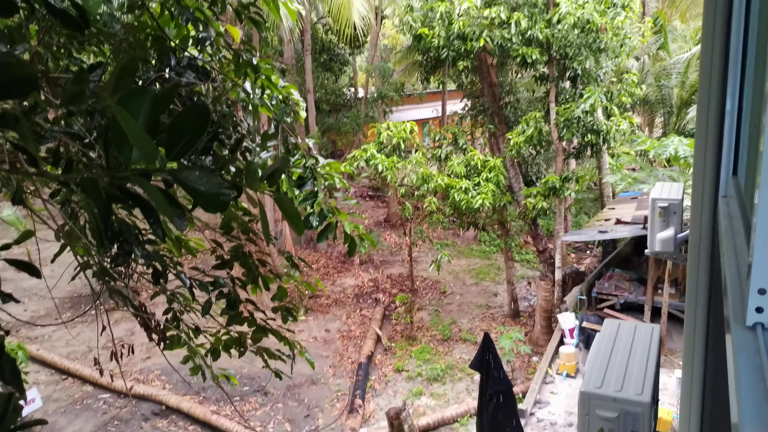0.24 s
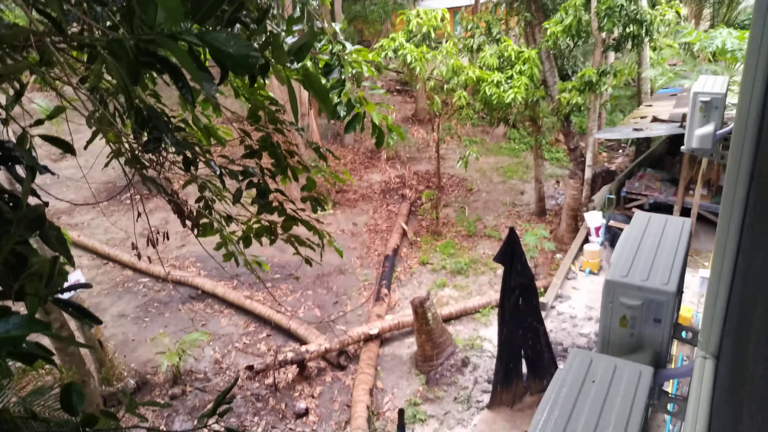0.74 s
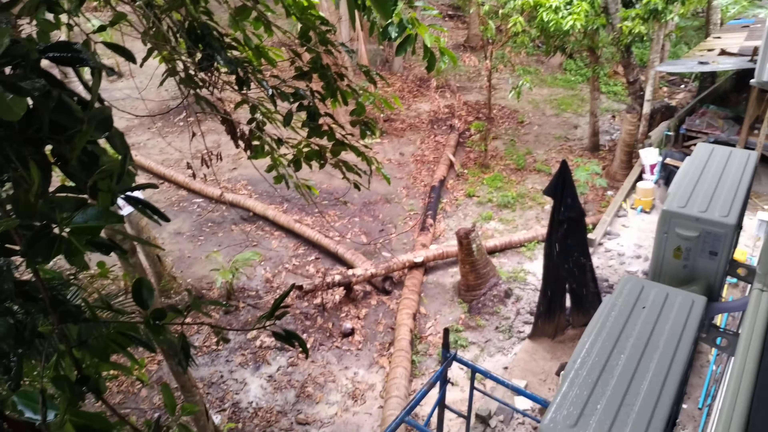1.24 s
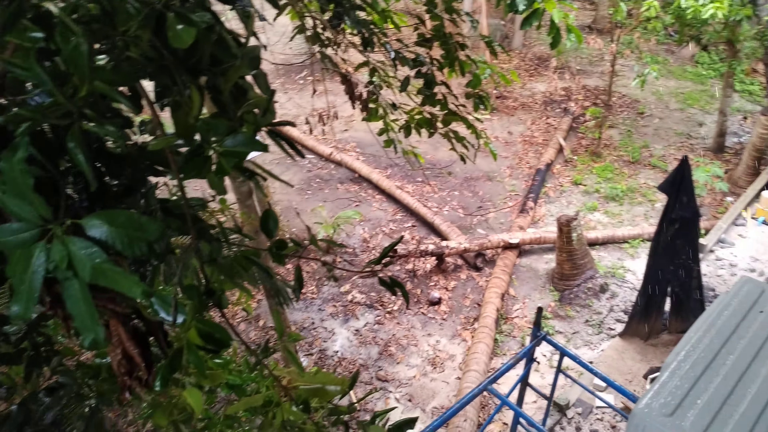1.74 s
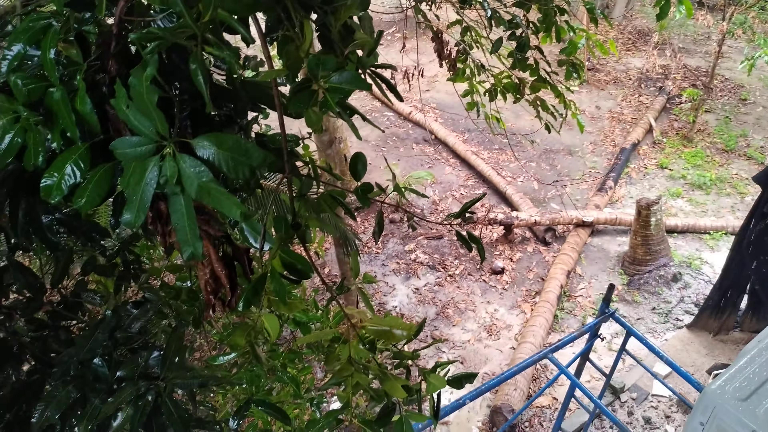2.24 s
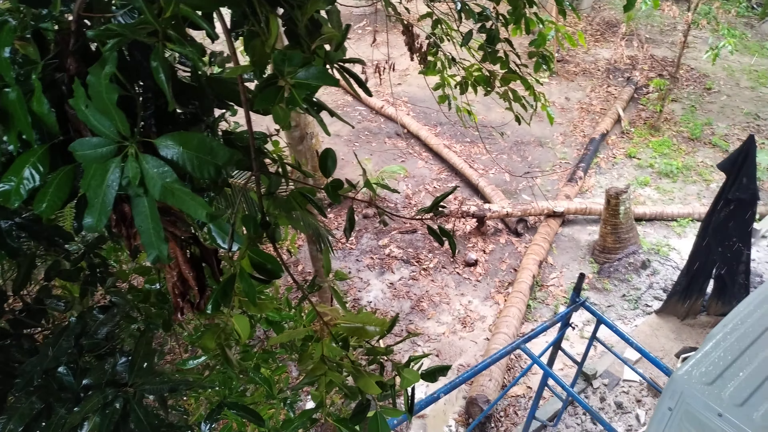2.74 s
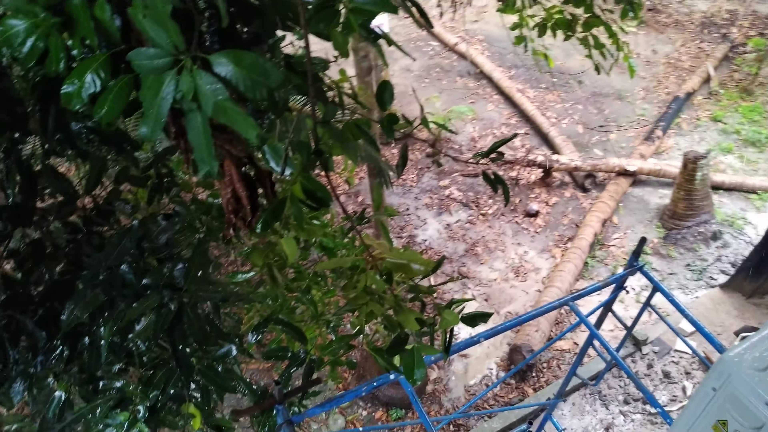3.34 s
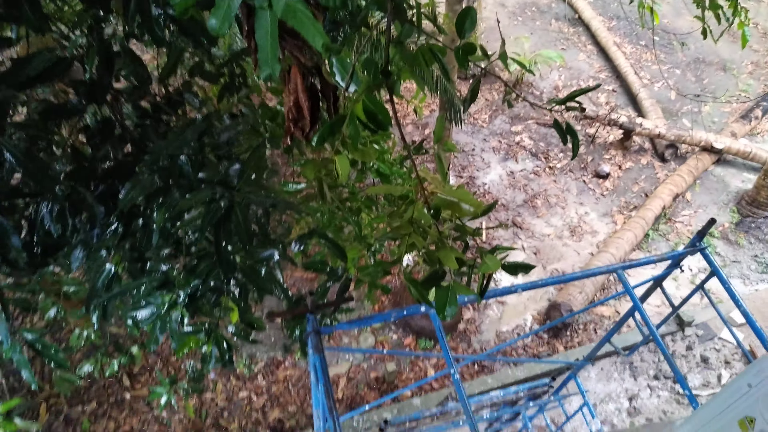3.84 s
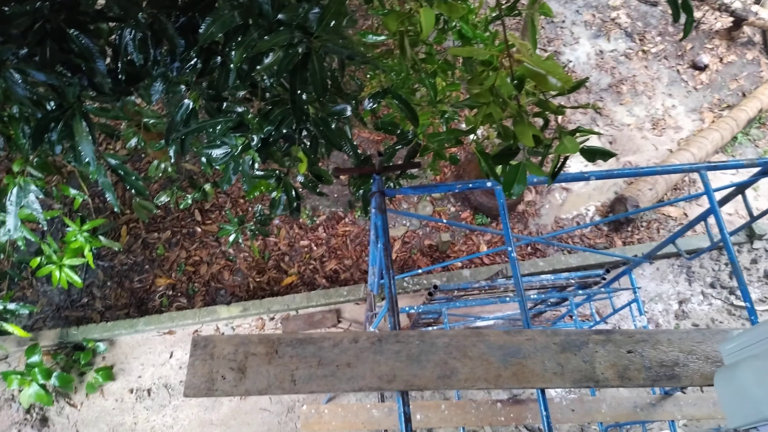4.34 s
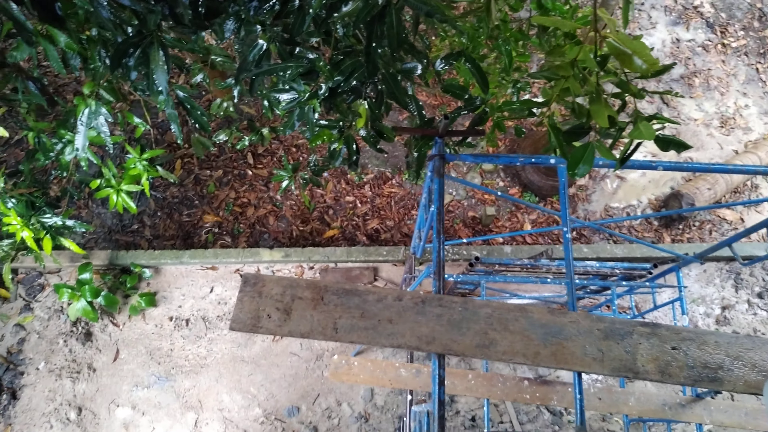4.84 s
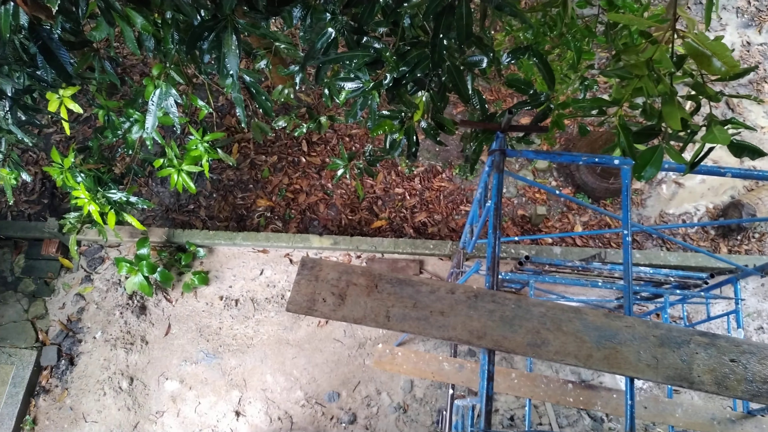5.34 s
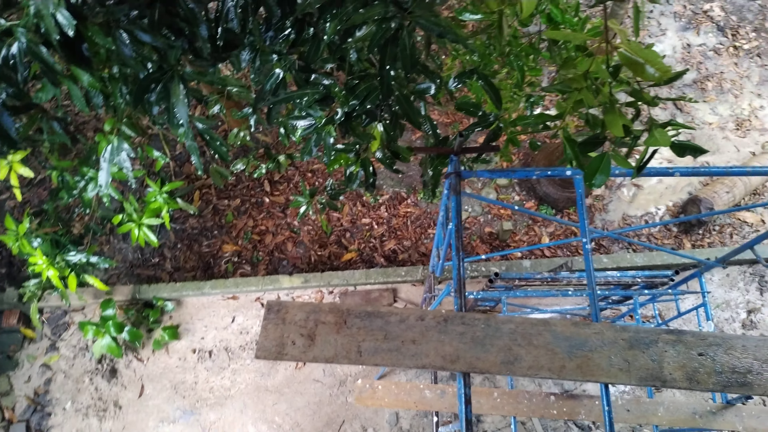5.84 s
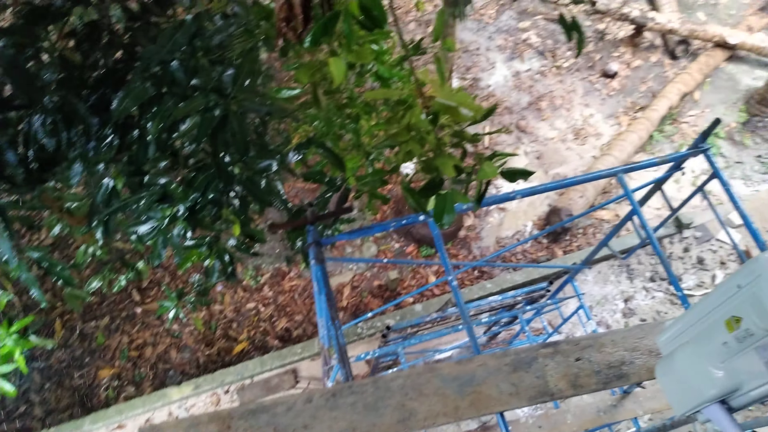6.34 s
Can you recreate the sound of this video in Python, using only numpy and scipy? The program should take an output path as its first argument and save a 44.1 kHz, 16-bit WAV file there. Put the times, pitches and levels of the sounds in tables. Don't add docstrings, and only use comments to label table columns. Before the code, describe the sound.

Steady downpour heard from a window: bright hiss, spattering eaves water, sharp ticks and small leaf knocks, plus brief finger thumps midway.

```python
import sys
import numpy as np
from scipy import signal
from scipy.fft import rfft, irfft
from scipy.io import wavfile
from scipy.ndimage import uniform_filter1d

SR = 44100
rng = np.random.default_rng(int(sys.argv[2]) if len(sys.argv) > 2 else 0)


def int16_out(signal):
    q = np.round(np.clip(np.atleast_2d(signal).T, -1, 1) * 32767)
    wavfile.write(sys.argv[1], SR, q.astype(np.int16))


def field_ratio(decibels):
    return 10 ** (np.asarray(decibels, dtype=float) / 20)


N = 290619

# [t/s, firing rate/Hz, loudest region f/Hz, level/dB]
ENGINE = [(0, 20.6, 103, -62), (1.1, 20.4, 100, -75), (1.7, 20.7, 138, -65.5), (2.5, 22.6, 132, -60.5),
          (3.6, 22.3, 128, -64), (4.05, 22.3, 114, -58.5), (4.4, 22.34, 110, -57.5), (4.52, 24.4, 138, -54),
          (5.15, 24.4, 144, -58.5), (5.5, 24.4, 111, -56.5), (6.0, 24.5, 121, -58), (6.2, 25, 155, -60),
          (6.59, 25, 150, -69)]
# [t/s, level/dB]
BREEZE = [(0, -52.5), (1.2, -54.5), (1.9, -57), (2.6, -55.5), (3.3, -51), (4.9, -54.5), (5.15, -60),
          (5.8, -52), (6.59, -59)]
# [t/s, peak level/dB, left minus right/dB, fall time/s]
GUSTS = [(.09, -54, 0, .3), (.64, -41, -5, 0.078), (.91, -61, -14, .1), (1.19, -52.5, 2, 0.44),
         (2.02, -57, 5, 0.13), (2.67, -51, 5, .15), (2.89, -46, 7, 0.077), (3.49, -47, -3, 0.1),
         (5.31, -45.5, 11, 0.13), (5.42, -43, 18.5, 0.12), (5.53, -40, -14, 0.066), (5.61, -45, 10, 0.036),
         (6.13, -53, 9, 0.12), (6.33, -49, 5, 0.069), (6.51, -46, 3, .07)]
# [t/s, pressure, length/ms, scrape level/dB]
BUMPS = [
    (3.438, -0.12, 0.59, -41),
    (3.44, 0.071, 2.9, -32),
    (3.445, -0.0019, .35, -38),
    (3.482, -0.079, 0.73, -48),
    (3.7948, 0.47, 3.7, -35),
    (3.8039, -0.42, 1.6, -26),
    (3.8067, -0.5, 0.62, -34),
    (3.813, -0.13, 6.6, -50),
    (3.84, 0.025, 42, -64),
    (3.9983, 0.05, 0.22, -20),
]
# [f/Hz, level/dB]
WASH = [(60, -5), (500, 1.5), (2000, -2.5), (5000, -4.5), (10000, -4), (15000, -2.5)]
# [t/s, peak level/dB, f/Hz, left
# minus right/dB, ring time/ms]
KNOCKS = [(0.149, -39, 2170, -7, 2.4), (0.253, -21, 3200, -7.5, 6.9), (0.554, -33, 288, -4, 6.1),
          (1.023, -28.5, 3260, -12, 3.9), (1.22, -27, 4060, 0.0, 3.2), (1.528, -36, 2400, -0.5, 3),
          (2.104, -30, 3660, 0.5, 2.7), (2.16, -34, 2080, 5, 3.7), (2.292, -24.5, 3320, -7, 6.4),
          (3.0286, -16.5, 790, 3, 2.16), (3.635, -31, 2400, -2.0, 2.3), (3.946, -23, 3930, 2, 2.7),
          (3.954, -17.5, 4960, -9, 2.5), (4.139, -33, 2130, -2, 3), (4.306, -20, 3900, -2, 2.6),
          (2.125, -33, 438, -3, 8.3), (2.293, -33, 340, -4, 5.8), (1.545, -33, 300, 0, 6.6),
          (4.742, -25, 4010, -8, 4.3), (5.827, -32, 2130, -1.0, 3), (5.939, -26.5, 2840, -6, 7.5),
          (6.032, -30.5, 1960, 3, 3.5), (6.158, -24.5, 5040, -10, 3.3), (6.362, -24, 4620, 2, 3.6),
          (3.0285, -24.5, 1500, 12, 1.9), (3.0286, -18, 5700, 6, 2.1), (3.3, -28, 3500, 3, 1.3),
        (4.4, -39, 380, -3, 4), (4.5, -28, 2600, 2, 4.4), (3.443, -27, 1050, -15, 3),
        (3.47, -40, 300, -12, 8), (3.9, -42, 350, -16, 6), (4.4, -27.5, 1300, -8, 1.2),
        (3.998, -30, 286, -9, 4), (3.84, -37, 980, -19, 3.3), (3.773, -34, 190, -22, 8),
        (3.79, -28, 650, -25, 6.9)]
# [t/s, click level/dB, left minus right/dB, burst level/dB]
TICKS = [(0.041, -28, -6, -26), (0.253, -16, 8, -11.5), (2.1042, -17, 6, -15), (2.305, -12, 1, -19),
         (2.4072, -14.5, 8, -17), (2.435, -26, 4, -18), (3.0299, -11.5, 5, -10), (3.03, -12, 8, -24),
         (3.378, -24, 11, -22), (3.7245, -18, 11, -18), (3.735, -18, 3, -19), (3.9982, -13, -18, -28),
         (4.406, -15, 2, -10.5), (4.4619, -12.5, -4, -16), (5.0437, -26, 4, -17), (5.1605, -10, -1, -16),
         (5.429, -18, 15, -15), (5.543, -22, 0, -12), (5.646, -14, 11, -28), (6.0905, -14, 6, -8),
         (6.145, -11, 2, -10.5), (6.369, -24, -1, -20), (6.3916, -11, 4, -10), (6.402, -14, 2, -28)]
# [t/s, click level/dB, left minus right/dB]
CRACKLES = [(.399, -22, 3), (.5114, -23, .5), (1.025, -19, 5), (1.1467, -23, 4), (1.2789, -26, 4),
            (1.702, -26, 5), (2.2337, -20, 4), (2.2422, -10, 5), (2.4174, -23, 4), (3.0384, -20, 3.5),
            (3.3607, -25, 5), (3.7992, -14, -2.5), (4.305, -22, 0), (4.744, -17, -.5), (4.7729, -23, 1),
            (4.8498, -20, 2.5), (4.8747, -24, 3), (6.0032, -25, 5), (6.0664, -19, -1.5), (6.0929, -17, 0),
            (6.0993, -16, -3), (6.1094, -19, 3), (6.138, -15, .5), (6.1484, -18, 4)]
# [t/s, level/dB, left minus right/dB]
SNAPS = [
    (3.0295, -11, 5),
    (3.9983, -15, -16),
    (5.6456, -24, 8),
    (3.7246, -21, 5),
    (6.0908, -18, 4),
    (6.3916, -23, 3),
]
# [t/s, peak level/dB, left minus right/dB]
DROPS = [(0.1458, -20.5, 2.5), (.397, -14.5, 4), (.5043, -16.5, 2), (1.02, -15.5, 12), (1.139, -16, 7),
         (1.314, -16, 5), (1.49, -13, 3), (1.7387, -19.5, 2), (1.8837, -21, 7), (2.0379, -18, 5),
         (2.642, -20.5, 2), (2.861, -20, 6), (2.909, -22, 0), (3.0732, -13, 6), (3.4512, -16.5, 7),
         (3.8268, -11, 3), (3.9488, -16, 4), (3.9722, -14, -1), (4.0724, -19, -4), (4.182, -16.5, -1),
         (4.3233, -17, -1), (4.572, -19, -3), (4.7456, -18.5, -5), (4.869, -16, 5), (5.072, -20, 12),
         (5.243, -20, 9), (5.8342, -17.5, -5), (5.945, -18, -8), (6.0544, -14, -1), (6.289, -19, 0)]
# [t/s, flow level/dB, heaviness of the water/dB]
FLOW = [(0, -47, 18), (.24, -34, 8.5), (.92, -36.5, 7), (1.1, -39, -10), (1.3, -32, -22), (1.62, -43.5, 17),
        (2.09, -36.5, 10), (2.45, -33.5, 6), (2.6, -40.5, 6), (2.97, -36, 8.5), (3.65, -35.5, 5.5),
        (3.9, -31, -8), (4.3, -34, -13), (4.8, -31, 3.5), (5.3, -34.5, -32), (5.7, -34.5, 3),
        (6.1, -31, 1.5), (6.59, -37.5, -11)]
# [t/s, peak level/dB, left minus right/dB, fall time/s]
SPLASHES = [(.26, -37, -4, .1), (1.03, -36, 4, 0.013), (1.34, -34.5, 10, 0.064), (1.52, -33, 6, 0.067),
            (2.11, -34.5, 6, 0.16), (2.246, -30, 1.5, 0.036), (2.307, -25.5, 3, 0.03),
            (2.48, -29.5, 2, 0.049), (2.66, -39, 11, 0.24), (3.03, -29.5, 1, 0.18), (3.28, -34.5, 9, 0.043),
            (3.38, -32.5, 2, 0.31), (3.727, -29, 1, 0.095), (3.8, -29.5, -6, .1), (3.89, -35, 9, .07),
            (4.04, -30.5, -4, 0.15), (4.26, -29.5, 1, 0.072), (4.33, -32, -2, 0.057), (4.41, -45, 2, .3),
            (4.75, -37, 0, .1), (4.86, -28.5, 4.5, 0.17), (5.16, -45, -1, 0.069), (5.25, -31, -0.5, 0.46),
            (5.43, -28.5, 0, 0.11), (5.54, -33.5, 6, 0.074), (5.63, -43, 4, 0.05), (5.96, -37, -4, 0.045),
            (6.15, -28.5, 0, 0.077), (6.35, -30, -4, .1), (6.44, -31.5, 0, 0.19)]
# [f/Hz, level/dB]
SPRAY = [(200, -49), (1000, -18.5), (2500, -7), (5000, -8.5), (10000, -1.5), (15000, -2)]
# [f/Hz, level/dB]
LEFT_EAR = [(60, -1.5), (200, -2.5), (600, -3.5), (1200, 0), (2050, 5), (3000, -0.5), (4100, -5), (5500, 1),
            (7500, -2), (12000, -3.5), (14500, -5)]
RIGHT_EAR = [(60, 0.5), (200, -1.5), (600, -3.5), (1200, -1), (2050, 2), (3100, 0), (4300, 0.5),
             (5500, -1.5), (7000, -1.5), (11000, -7.5), (14500, -13)]
# [f/Hz, width/Hz, lift/dB]
PORTS = [
    (10070, 737, 17.5),
    (8536, 800, 15.5),
]

TAIL = 6000


def colour(x, points):
    hz, db = np.transpose(points)
    f = np.maximum(np.arange(1025) * SR / 2048, 1)
    log_gain = np.interp(np.log(f), np.log(hz), db) * np.log(10) / 20
    cepstrum = irfft(log_gain)
    cepstrum[1:1024] *= 2
    cepstrum[1025:] = 0
    response = irfft(np.exp(rfft(cepstrum)))
    response = response.reshape((1,) * (x.ndim - 1) + (-1,))
    return signal.fftconvolve(x, response, axes=-1)[..., :N]


def ring(x, hz, width):
    return signal.lfilter(*signal.iirpeak(hz, hz / width, fs=SR), x)


def unit(x):
    return x / np.sqrt(np.mean(x ** 2))


def walk(rate):
    hold = int(SR / rate)
    held = rng.standard_normal(400)[np.arange(N) // hold]
    return 1.42 * uniform_filter1d(uniform_filter1d(held, hold), hold)


def curves(table):
    s, *columns = np.transpose(table)
    return [np.interp(np.arange(N) / SR, s, column) for column in columns]


def sides(pan_db):
    return field_ratio(np.array([[pan_db], [-pan_db]]) / 2)


def add_at(out, s, sound):
    start = int(s * SR)
    out[:, start:start + sound.shape[1]] += sound


def swells(table, rise):
    t = np.arange(0, N, 32) / SR
    power = 0
    for s, db, pan_db, fall_s in table:
        fade = np.maximum((t - s) / fall_s, (s - t) / (rise * fall_s))
        power = power + sides(pan_db) ** 2 * field_ratio(2 * db - 20 * fade)
    return np.repeat(power, 32, axis=1)[:, :N]


def crackling(size):
    return signal.lfilter([1], [1, -.93], size)


def patter(rate, spread_db, shared):
    hit = rng.random(N) < rate / SR
    size = hit * field_ratio(spread_db * np.minimum(rng.exponential(size=N), 5))
    noise = rng.standard_normal((3, N))
    return unit(crackling(size) * (shared * noise[0] + noise[1:]))


def engine():
    rate_hz, loud_hz, level_db = curves(ENGINE)
    turn = 2 * np.pi * np.cumsum(rate_hz) / SR
    out = 0
    for k in range(3, 10):
        loss_db = np.minimum(0.42 * abs(k * rate_hz - loud_hz), 14)
        gain = field_ratio(level_db - 1.5 - loss_db + 2.0 * walk(2.95))
        out = out + gain * np.sin(k * turn + 6 * rng.random())
    return out


def wind():
    strength = np.sqrt(field_ratio(2 * curves(BREEZE)[0]) + swells(GUSTS, rise=0.77))
    band = signal.butter(2, [14, 52], "band", fs=SR, output="sos")
    rumble = unit(signal.sosfilt(band, rng.standard_normal((2, N))))
    flutter_db = 0.5 + 0.37 * np.array([walk(22), walk(22.18)])
    return field_ratio(flutter_db) * strength * rumble


def finger():
    t, out = np.arange(N) / SR, 0
    scrape = unit(ring(ring(rng.standard_normal(N), 600, 1300), 600, 1300))
    for s, pressure, ms, scrape_db in BUMPS:
        hump = np.exp(-.5 * ((t - s) * 1000 / ms) ** 2)
        out = out + hump * (pressure + field_ratio(scrape_db) * scrape)
    return np.array([field_ratio(-46) * out, out])


def wash():
    alike_hz, lag_ms = 860, 0.22
    common, own = rng.standard_normal(N), rng.standard_normal((2, N))
    low = signal.butter(1, alike_hz, fs=SR)
    common = signal.lfilter(*low, common)
    late = np.interp(np.arange(N) - lag_ms * SR / 1000, np.arange(N), common)
    own_treble = own - 1.05 * signal.lfilter(*low, own)
    hiss = colour(np.array([late, common]) + own_treble, WASH)
    patches = 0
    for hz in (350, 700, 1400, 2800, 5600, 11200):
        flicker = 0.15 * (walk(4.98) + walk(17))
        patches = patches + flicker * ring(hiss, hz, 0.35 * hz)
    return field_ratio(-36) * (hiss + patches)


def knocks():
    blow, width_share = 10.7, 0.29
    out, ms = np.zeros((2, N + TAIL)), np.arange(TAIL) / SR * 1000
    for s, peak_db, hz, pan_db, ring_ms in KNOCKS:
        noise = rng.standard_normal((3, TAIL))
        push = blow * (ms == 0) + noise[0] + 2.5 * noise[1:]
        note = ring(push * np.exp(-ms / max(ring_ms, .5)), hz, width_share * hz)
        add_at(out, s + .001, field_ratio(peak_db - 1.5) * sides(pan_db) * note / np.abs(note).max())
    return out[:, :N]


def ticks():
    fade_ms, edge = 0.34, .45
    out, ms = np.zeros((2, N + 256)), np.arange(256) / SR * 1000
    lone = [(s + 0.00092, click_db - 2, pan_db) for s, click_db, pan_db in CRACKLES]
    for s, click_db, pan_db in [row[:3] for row in TICKS] + lone:
        push = 2.5 * (ms == 0) + rng.standard_normal((2, 256))
        crack = ring(push * np.exp(-ms / fade_ms), 8900, 7900)
        crack[:, :2] += edge * np.linalg.norm(crack, axis=1, keepdims=True) * [1, -1]
        crack = crack / np.linalg.norm(crack, axis=1, keepdims=True)
        add_at(out, s, field_ratio(click_db + 1) * sides(pan_db) * crack)
    for s, snap_db, pan_db in SNAPS:
        add_at(out, s, field_ratio(snap_db) * sides(pan_db) * [1, -.7])
    return out[:, :N]


def small_drops(count):
    when, size, side = rng.random((count, 3)).T
    peak_db = -24.5 + 4 * (2 * size - 1)
    pan_db = 3.5 + 8 * (side - .5)
    return list(zip(when * N / SR, peak_db, pan_db))


def drops():
    crack_ms, gather_ms, scatter_ms = 0.92, 1.27, 24
    out, ms = np.zeros((2, N + 2 * TAIL)), np.arange(TAIL) / SR * 1000
    bursts = [(s - .001, burst_db, -0.5 + 0.92 * pan_db) for s, _, pan_db, burst_db in TICKS]
    for s, peak_db, pan_db in DROPS + bursts + small_drops(count=36):
        noise = rng.standard_normal((2, TAIL))
        hit = rng.random(TAIL) < .11
        size_db = 1.22 * np.minimum(rng.exponential(size=TAIL), 2.6) - 18
        crack = 0.34 * noise * np.exp(-ms / crack_ms)
        droplets = noise * crackling(hit * field_ratio(size_db))
        scatter = droplets * (1 - np.exp(-ms / gather_ms)) * np.exp(-ms / scatter_ms)
        bright = np.diff(crack + scatter, prepend=0)
        level_db = 0.81 * (peak_db + 17.5) - 13.0 - 8.5
        add_at(out, s + .0008, field_ratio(level_db) * sides(pan_db - 5.0) * bright)
    return out[:, :N]


def splatter():
    flow_db, heavy_db = curves(FLOW)
    power = field_ratio(2 * flow_db) * sides(1.5) ** 2 + swells(SPLASHES, rise=0.092)
    spray = colour(patter(5000, 1.6, 0.048), SPRAY)
    slap = ring(patter(700, 4.2, .5), 2600, 2500)
    surge_db = 1.22 * (10 * np.log10(power) + 37) - 35 + walk(25)
    return field_ratio(surge_db - 6) * sides(-3.5) * (spray + field_ratio(heavy_db - 11.5) * slap)


def through_ports(rain):
    heard = []
    for side, (hz, width, lift_db), ear in zip(rain, PORTS, (LEFT_EAR, RIGHT_EAR)):
        heard.append(colour(side + field_ratio(lift_db) * ring(side, hz, width), ear))
    return np.array(heard)


def scene():
    rain = wash() + knocks() + ticks() + drops() + splatter()
    return engine() + wind() + finger() + through_ports(rain)


def top_cut(x):
    return signal.sosfilt(signal.butter(12, 16500, fs=SR, output="sos"), x)


def record(dry):
    x = signal.sosfilt(signal.butter(1, 8, "high", fs=SR, output="sos"), dry)
    low = signal.sosfiltfilt(signal.ellip(10, .1, 50, 14280, fs=SR, output="sos"), x)
    top = x - low
    sharp = uniform_filter1d(top ** 2, 64) > 11 * uniform_filter1d(top ** 2, 4096)
    gate = uniform_filter1d(1. * sharp, 64)
    return top_cut(low + field_ratio(-15) * gate * top)


dry = scene()
out = record(dry)
int16_out(out)
```